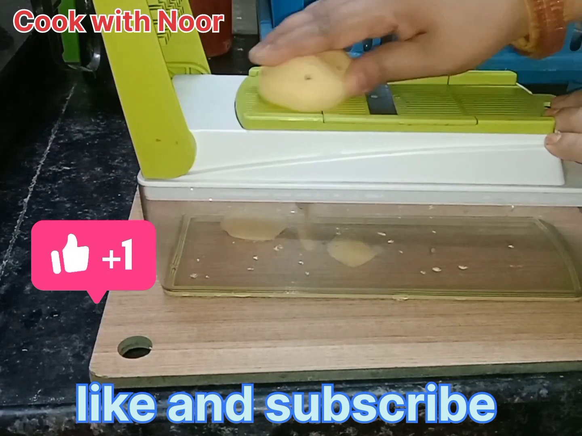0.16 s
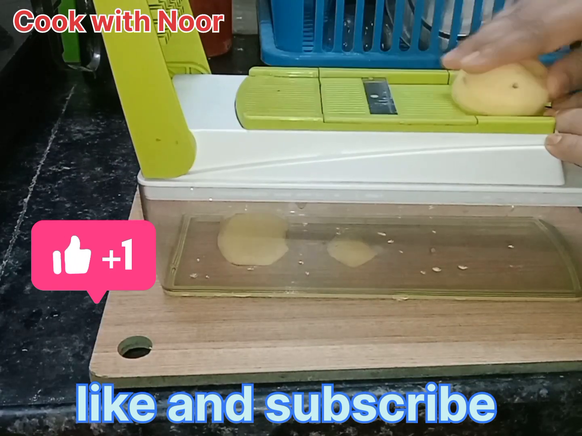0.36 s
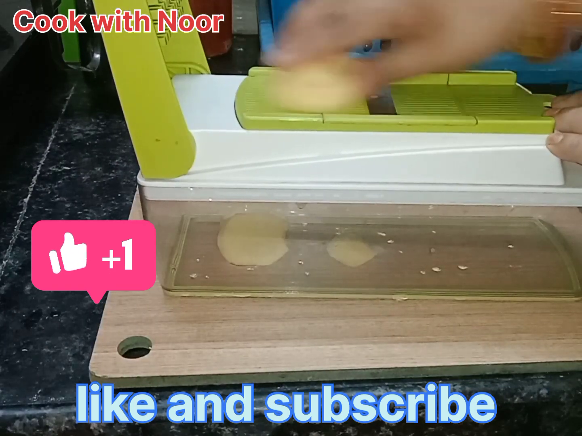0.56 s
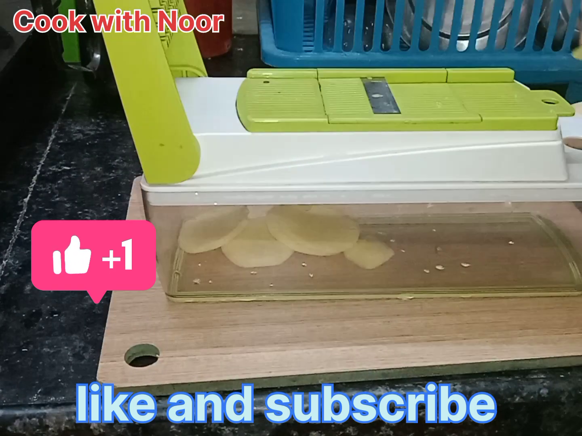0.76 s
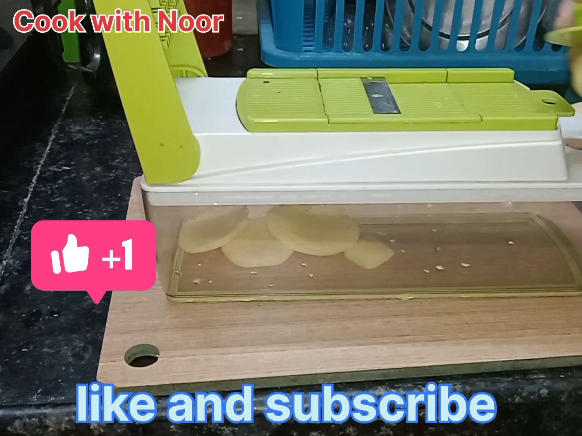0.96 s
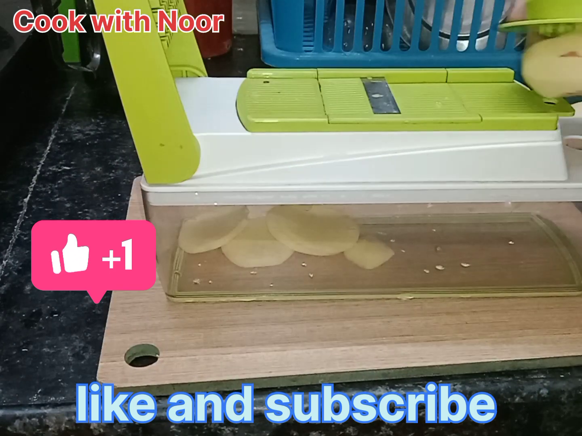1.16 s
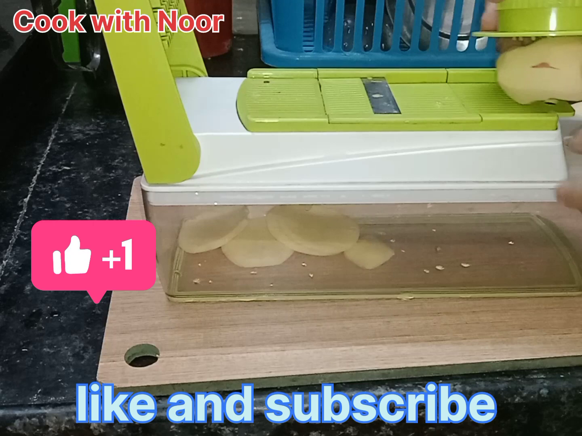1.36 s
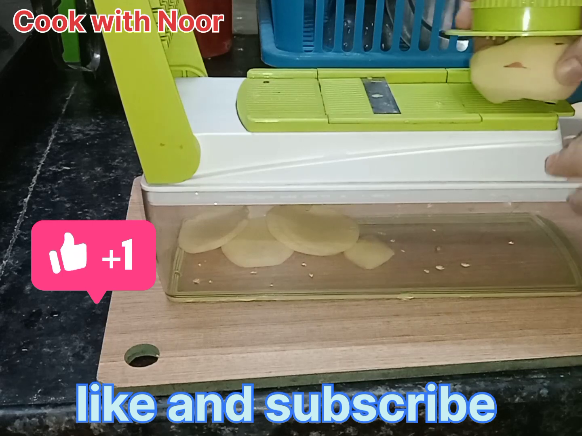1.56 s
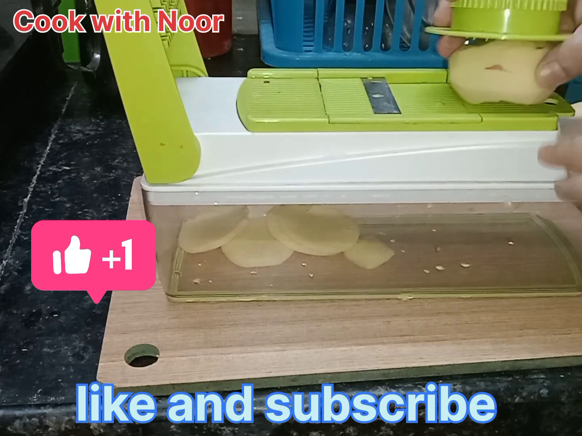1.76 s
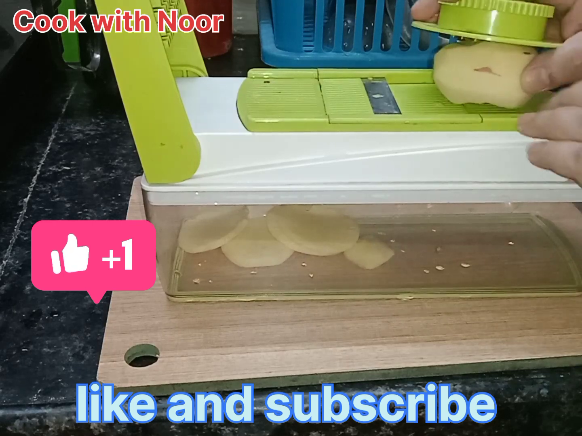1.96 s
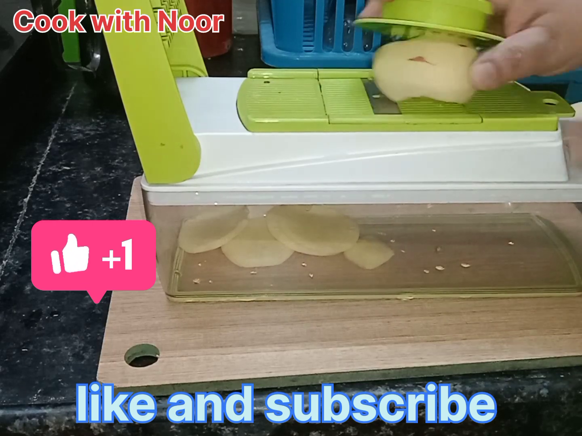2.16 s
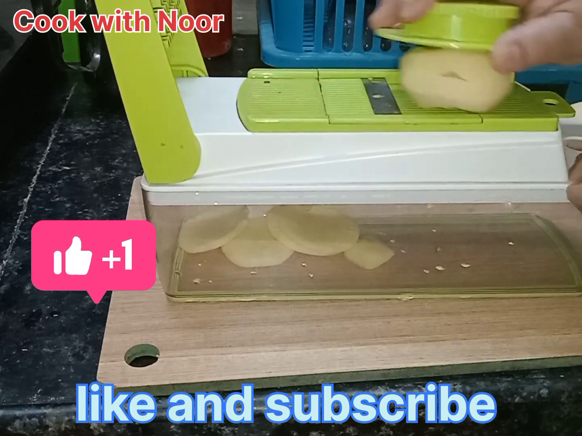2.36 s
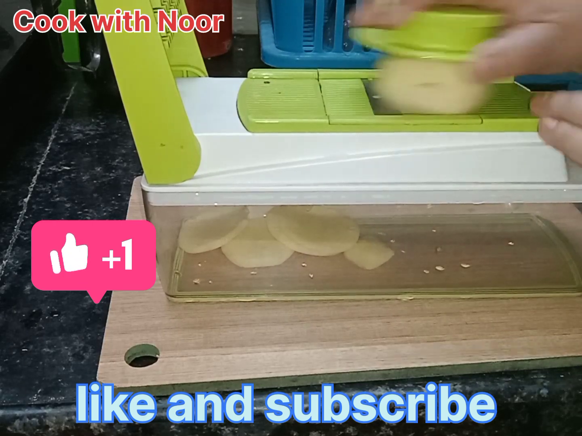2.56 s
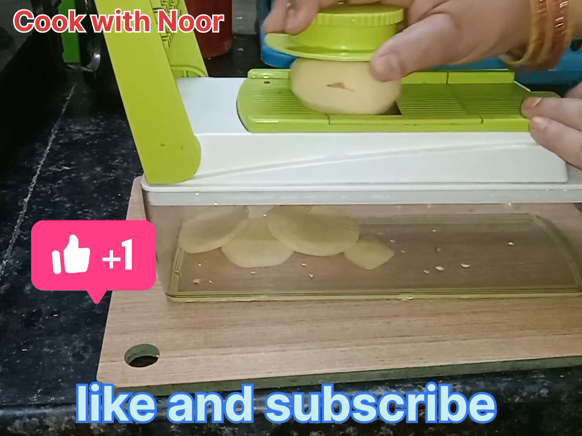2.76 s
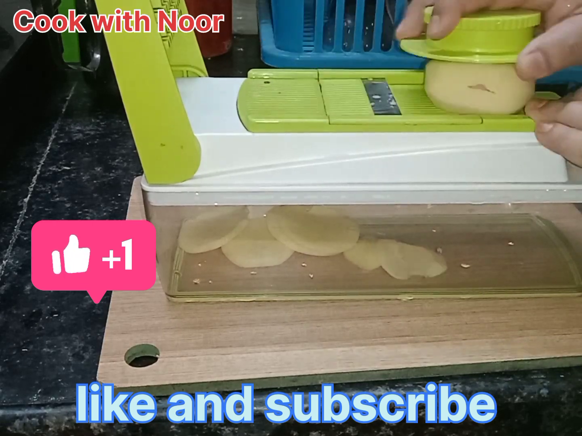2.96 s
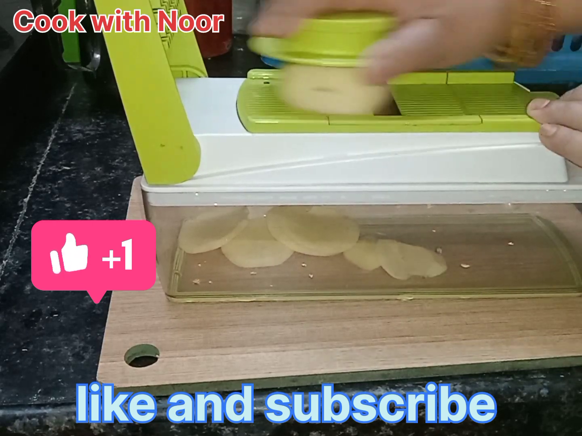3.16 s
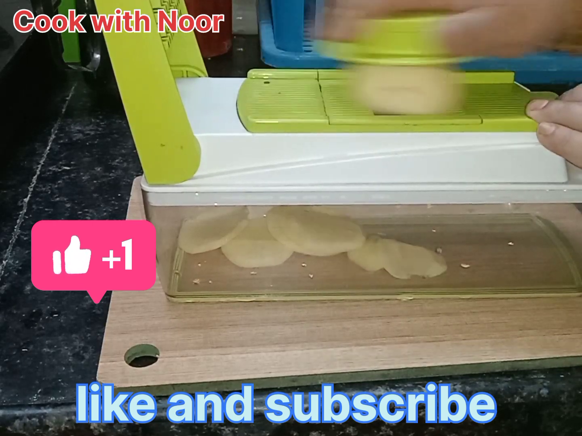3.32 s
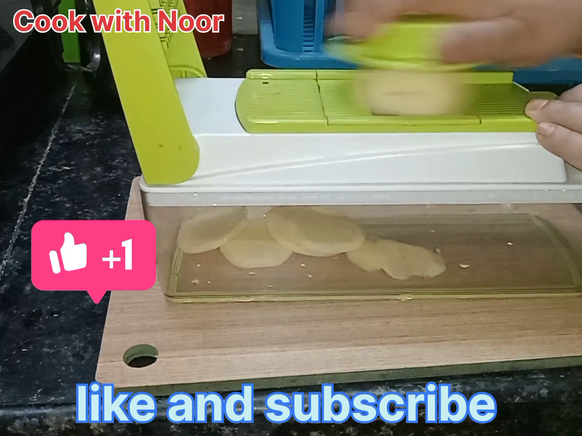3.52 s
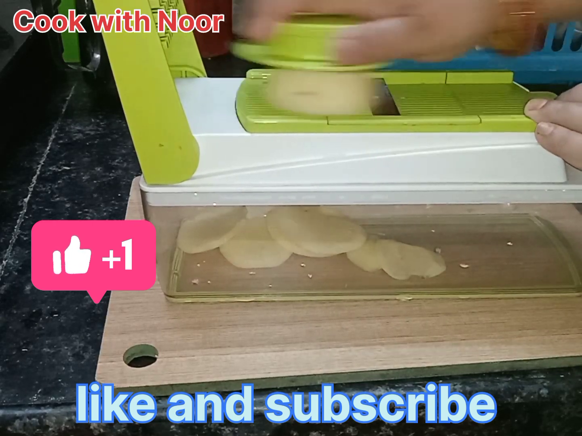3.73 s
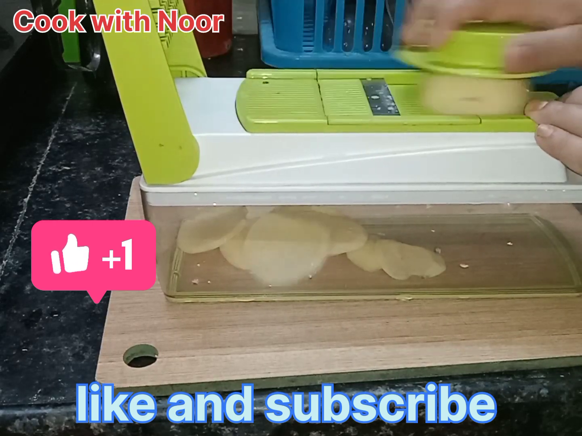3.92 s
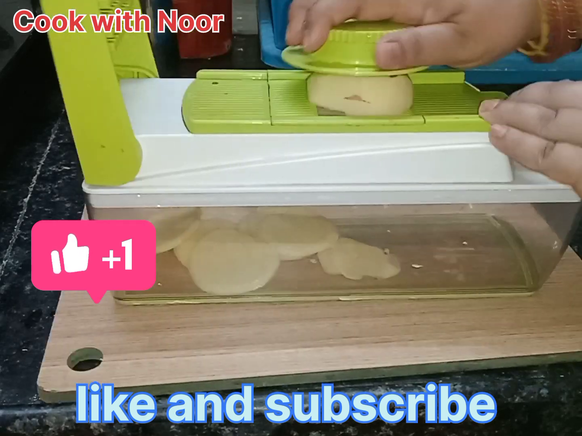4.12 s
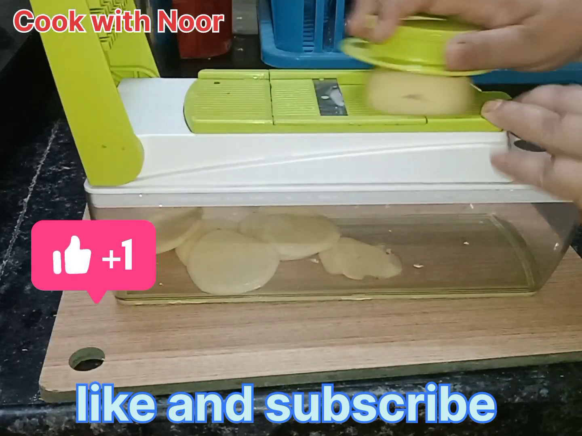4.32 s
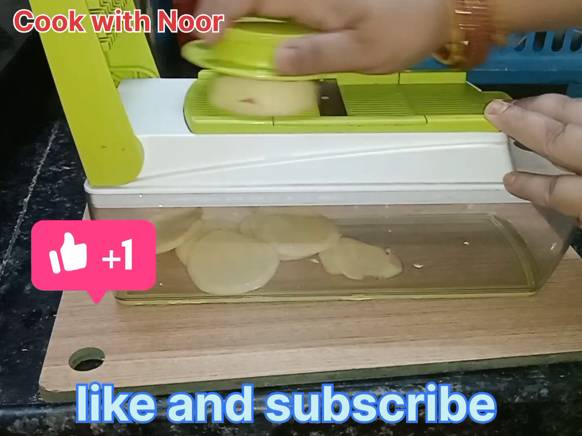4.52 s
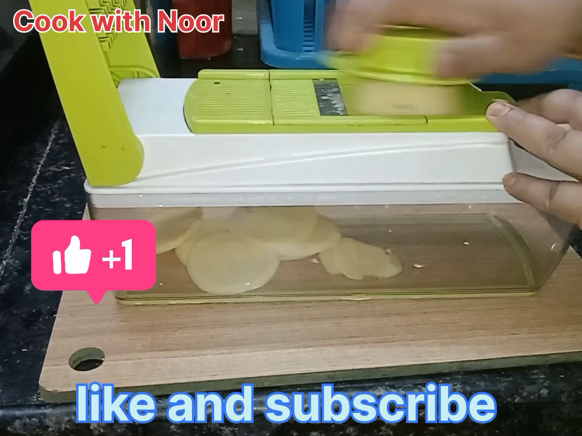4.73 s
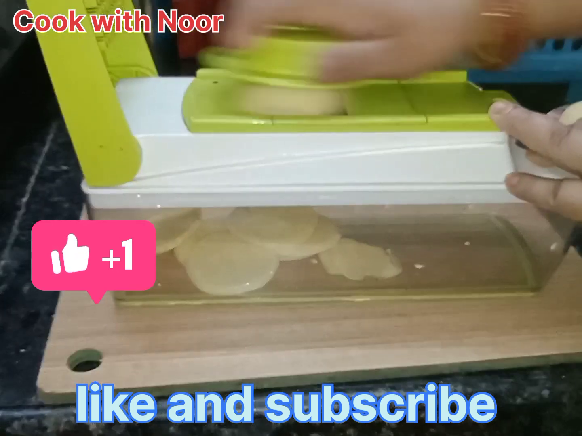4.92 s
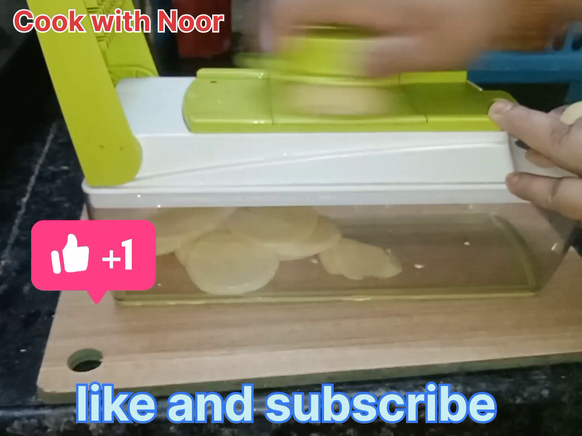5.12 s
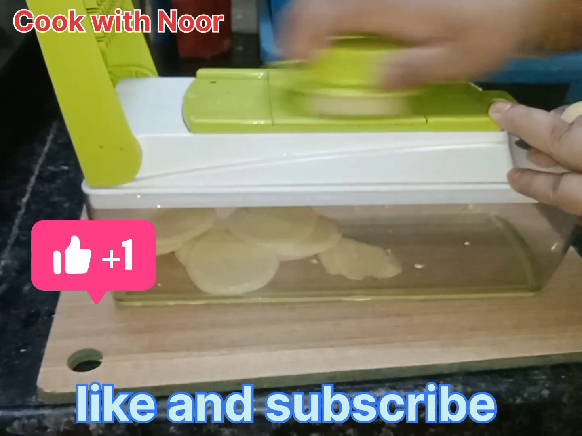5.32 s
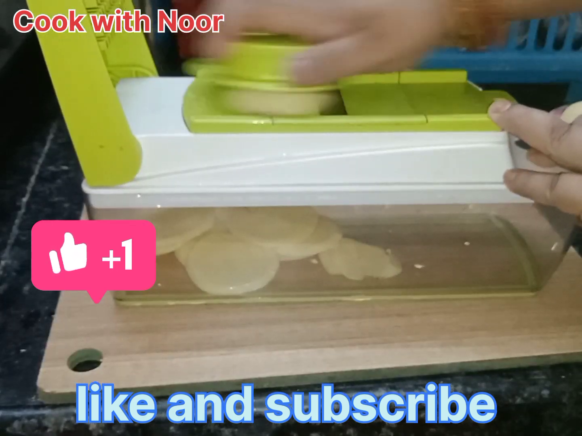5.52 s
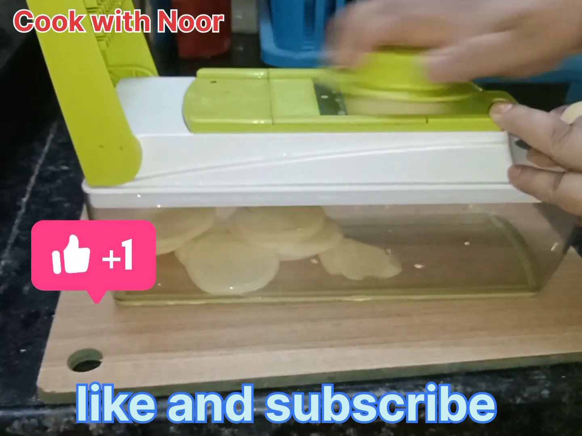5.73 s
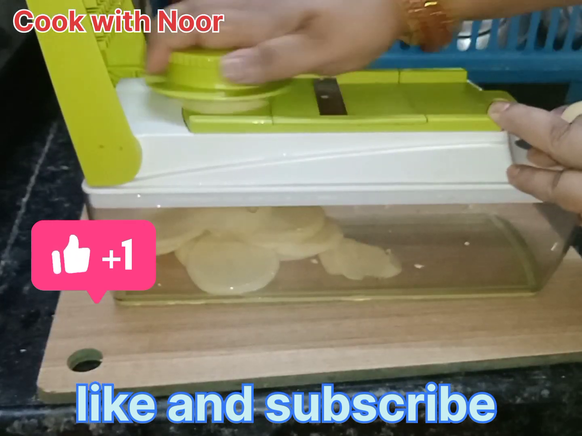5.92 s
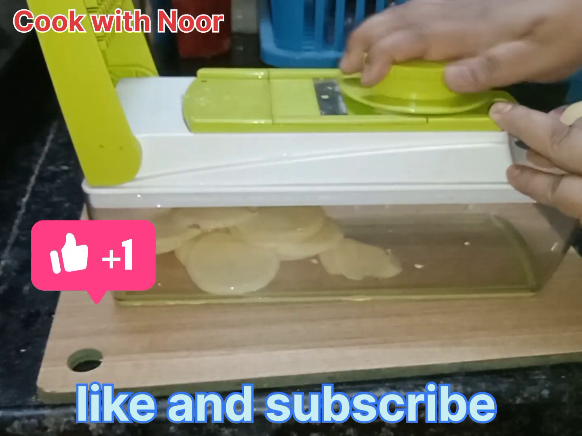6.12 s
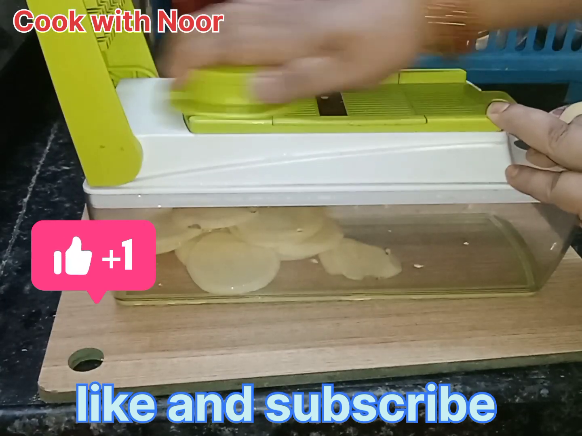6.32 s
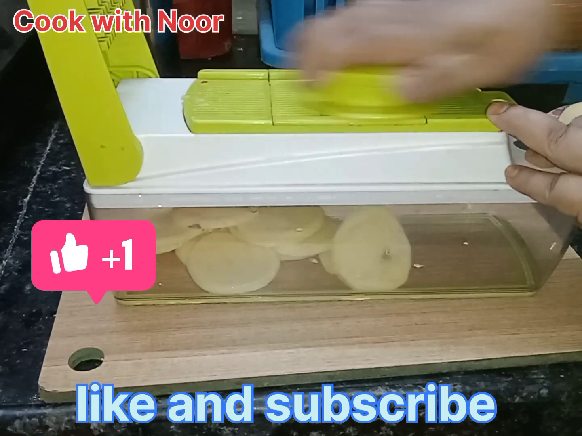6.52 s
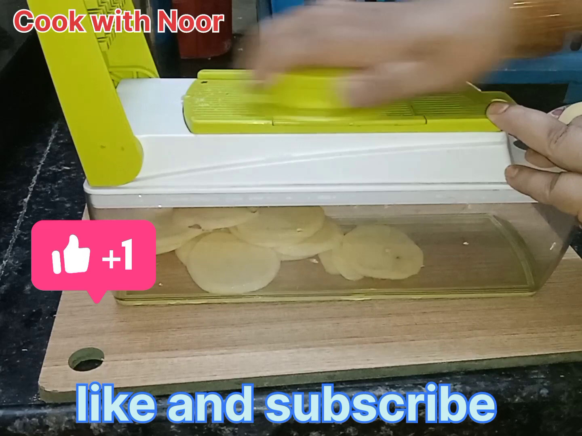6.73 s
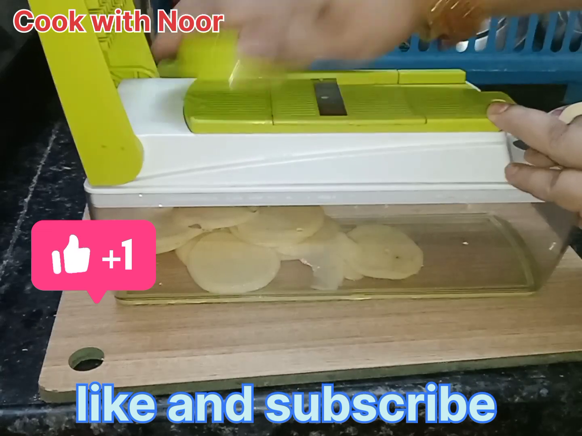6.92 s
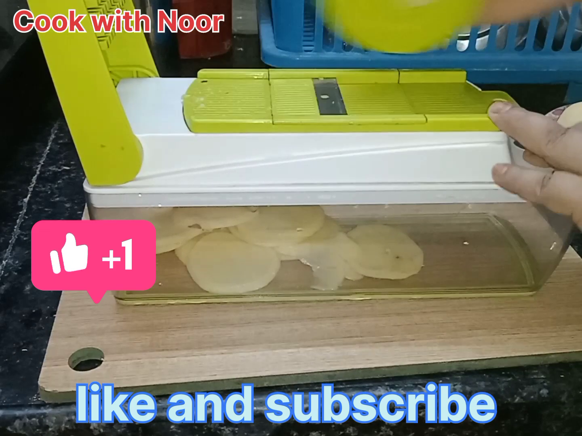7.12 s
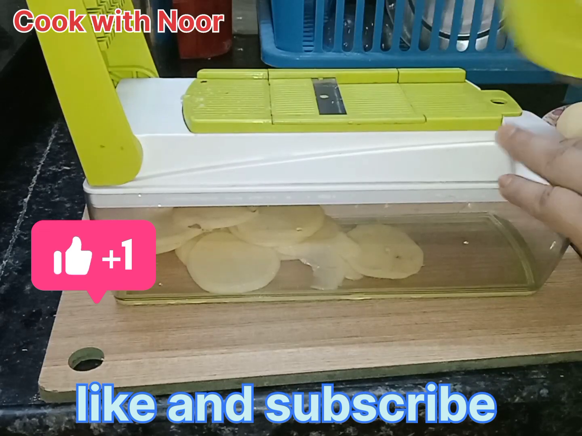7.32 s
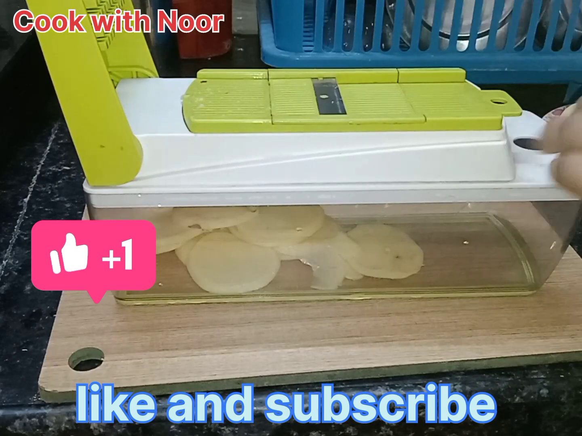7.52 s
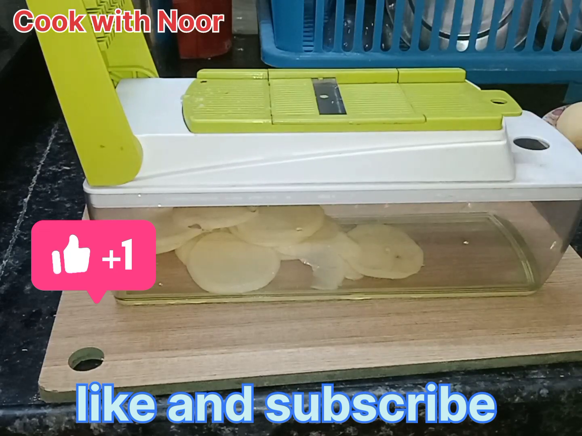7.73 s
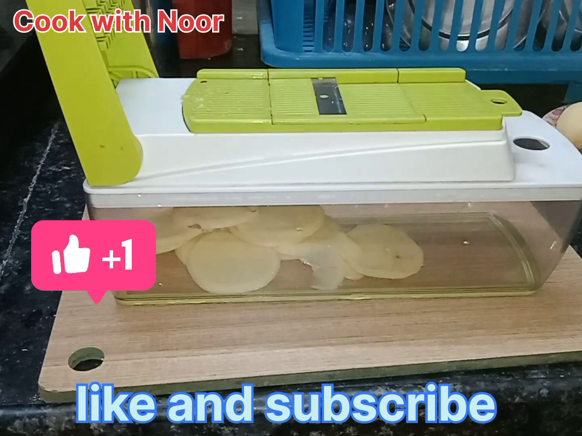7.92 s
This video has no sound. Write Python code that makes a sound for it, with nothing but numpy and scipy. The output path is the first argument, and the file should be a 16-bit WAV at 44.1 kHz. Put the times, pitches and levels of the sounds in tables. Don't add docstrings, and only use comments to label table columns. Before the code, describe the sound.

Wet scrapes and hard hollow knocks, a sudden cut to near quiet with plastic snaps, then potato slicing resumes in a steady back-and-forth rhythm.

```python
import sys
import numpy as np
from scipy import signal
from scipy.fft import rfft, irfft
from scipy.io import wavfile
from scipy.ndimage import map_coordinates

SR = 44100
rng = np.random.default_rng(int(sys.argv[2]) if len(sys.argv) > 2 else 0)


def elevation(decibels):
    levels = np.asarray(decibels, float)
    return 10 ** (levels / 20)


def transcribe(u):
    v = np.clip(np.atleast_2d(u).T, -1, 1)
    q = np.round(v * 32767).astype(np.int16)
    wavfile.write(sys.argv[1], SR, q)


N = 351918
CUT_S = 0.7765


# [f/Hz, level/dB, t60/s]
BOX_MODES = [(195, 11, .08), (299, 4, .047), (375, 4, .04)]
# [f/Hz, level/dB, t60/s]
DECK_MODES = [(459, 2, 0.014), (650.5, -9, 0.072), (825.4, -5.5, 0.07), (1047, -2, 0.023),
              (1310, -8.5, 0.048), (1940, -14, 0.054), (2160, -0.5, 0.0092)]
# [f/Hz, level/dB per Hz]
RUB_SPECTRUM = [(240, -5.5), (400, -9), (698, -3), (826, -2.5), (906, -2.5), (1250, -5.5), (1370, -40),
                (2120, -23), (3000, -15.5), (3900, -58.5), (6600, -120)]
# [f/Hz, level/dB per Hz]
HISS_SPECTRUM = [(1410, 0.5), (2400, -3.5), (2520, -3.5), (2930, -4.5), (3570, -4.5), (4860, -8.5),
                 (7230, -2), (7710, -9), (8750, -13.5), (9780, -17), (12500, -21.5), (13500, -24),
                 (15000, -10.5), (16000, -9)]
# [start t/s, swell t/s, hold t/s, level/dB]
FINGER_RUSTLES = [
    (1.081, 0.024, 0.38, -76.5),
    (1.51, .012, .002, -67.5),
    (2.126, 0.099, .002, -70.5),
    (2.38, 0.0065, .002, -84),
    (2.446, 0.013, .002, -69),
]


def strokes():
    bumps = grains(per_s=410, spread_db=2.5)
    rumble = rms_one(sum(elevation(db) * ring(bumps, hz, 1.27 * t60) for hz, db, t60 in BOX_MODES))
    slips = grains(per_s=1000, spread_db=2.0)
    ringing = rms_one(sum(elevation(db) * ring(slips, hz, 0.3 * t60) for hz, db, t60 in DECK_MODES))
    rub = rms_one(coloured(slips, RUB_SPECTRUM) + 0.68 * ringing)
    hiss = coloured(grains(per_s=9000, spread_db=2.0) + 0.3 * slips, HISS_SPECTRUM)
    flutter_db = 3.04 * drift(45)
    rustle_gain = swells(*np.transpose(FINGER_RUSTLES), fall=440)
    hiss_gain = pressure(layer=0) * elevation(flutter_db - 6.5) + rustle_gain
    scrape = pressure(layer=1) * elevation(flutter_db + 2.0) * rub + hiss_gain * hiss
    return pressure(layer=2) * rumble + patchy(scrape, patchy_db=3.0)


# [start t/s, swell t/s, hold t/s, wet hiss level/dB, deck rub level/dB]
PUSH_STROKES = [(0.118, 0.0065, 0.0024, -31, -33.5), (0.281, 0.0058, 0.035, -40.5, -42.5),
                (0.56, 0.014, 0.033, -43.5, -45.5), (0.735, 0.022, 0.014, -43, -45.5),
                (2.645, 0.036, 0.089, -48.5, -53.5), (3.147, 0.026, 0.065, -46, -50),
                (3.605, 0.025, 0.046, -43.5, -48.5), (4.07, 0.084, 0.0095, -45, -46),
                (4.472, 0.047, 0.054, -46.5, -52), (4.915, 0.059, 0.044, -43.5, -45.5),
                (5.4, 0.014, 0.059, -46.5, -49.5), (5.84, 0.039, 0.026, -41.5, -46),
                (6.155, 0.037, 0.042, -50.5, -51.5), (6.31, 0.024, 0.062, -44, -49),
                (6.631, 0.0038, 0.029, -44, -41.5), (6.772, 0.052, 0.05, -41, -48)]
# [start t/s, swell t/s, hold t/s, wet hiss level/dB, deck rub level/dB]
RETURN_STROKES = [(0.0, 0.00041, 0.0015, -66, -38.5), (0.44, 0.0089, .01, -92, -52.5),
                  (2.95, 0.0092, 0.0018, -52, -54.5), (2.99, 0.0091, 0.01, -60, -50.5),
                  (3.45, 0.0053, 0.039, -54.5, -52.5), (3.91, 0.008, .03, -48.5, -51.5),
                  (4.066, .006, 0.024, -53, -60), (4.28, 0.019, 0.0016, -62.5, -50),
                  (4.795, 0.0091, 0.03, -54.5, -48), (5.25, 0.0074, 0.034, -53.5, -54),
                  (5.685, 0.019, 0.033, -51, -53.5), (6.05, 0.022, 0.0088, -50, -46.5),
                  (6.5, 0.033, .002, -52.5, -66)]
PUSH_FALL, RETURN_FALL = (249, 307, 100), (165, 345, 180)   # hiss, rub, rumble die away (dB per s)


def pressure(layer):
    out = 0
    for rows, fall in ((PUSH_STROKES, PUSH_FALL), (RETURN_STROKES, RETURN_FALL)):
        start, swell, hold, hiss_db, rub_db = np.transpose(rows)
        rumble_db = -56.5 + 0.6 * (rub_db + 49)
        db = hiss_db, rub_db, rumble_db
        out = out + swells(start, swell, hold, db[layer], fall[layer])
    return out


# [t/s, thud level/dB, lowest mode level/dB, clack level/dB, crack level/dB]
BLADE_BITES = [(0.1237, -15, -9, -20, -27.5), (0.286, -24, -18.5, -25, -57), (0.568, -21.5, -7, -32, -64),
               (0.581, -17.5, -16, -20, -26.5), (0.752, -29, -9.5, -20, -50),
               (2.689, -45, -7.5, -31.5, -80), (3.175, -34.5, -10.5, -30.5, -63),
               (3.606, -48, -16, -47, -72), (3.629, -27.5, -8.5, -22.5, -69),
               (4.073, -36.5, -7.5, -38.5, -53), (4.152, -24, -16.5, -33, -42.5),
               (4.485, -51, -3, -38.5, -53), (4.911, -48, -16, -34.5, -88), (4.937, -50, -23, -36, -80),
               (4.96, -33, -10, -28.5, -49), (5.42, -40.5, -10, -23, -50), (5.863, -38.5, -27, -33, -69),
               (6.204, -40.5, -34, -29, -44.5), (6.401, -42.5, -16, -23.5, -43),
               (6.637, -33, -15.5, -34.5, -35.5), (6.785, -47, -5, -31, -61), (6.832, -49, -25, -33, -60),
               (6.862, -46, -25, -16.5, -48)]
# [t/s, thud level/dB, lowest mode level/dB, clack level/dB, crack level/dB]
STEP_DROPS = [(2.956, -44, -14, -41, -50), (3.018, -21, -16, -35, -57), (3.479, -21.5, -13.5, -34.5, -64),
              (3.918, -36.5, -6, -36.5, -68), (3.951, -15, -12, -27, -48), (4.286, -49, -8, -44, -53),
              (4.802, -31.5, -16, -41, -55), (4.841, -21, -9.5, -33.5, -52.5),
              (5.259, -32.5, -18, -48.5, -63), (5.292, -16.5, -16, -31, -53), (5.71, -29, -23, -45, -47.5),
              (5.737, -22.5, -18, -27, -49), (6.068, -36, -25, -43, -48.5)]
# [t/s, thud level/dB, lowest mode level/dB]
TURN_BUMPS = [(0.001, -38, -25), (0.447, -20.5, -14.5), (2.997, -36, -6), (3.363, -34, -17.5),
              (3.457, -27.5, -22.5), (3.771, -37.5, -9.5), (4.004, -50, 8.5), (4.133, -37.5, -12.5),
              (4.676, -45.5, -3), (5.637, -45, -6), (5.799, -42, -20), (5.966, -44, -9), (6.051, -42, -15),
              (6.168, -37.5, -31), (6.526, -44, -21)]


def knocks():
    dull = [(s, db, low, db - 13, db - 48) for s, db, low in TURN_BUMPS]
    blows = sorted(list(map(tuple, BLADE_BITES)) + list(map(tuple, STEP_DROPS)) + dull)
    s, thud_db, low_db, clack_db, crack_db = np.transpose(blows)
    upper_db = 2.5 + 0.7 * np.minimum(clack_db - thud_db, 4.0) - 0.17 * (thud_db + 44)
    upper_db = upper_db + 0.8 * (s - 4.0)
    chance = rng.standard_normal((len(s), len(DECK_MODES)))
    out = np.zeros(N)
    jolt = soften(rng.standard_normal(N), 0.00006)
    for (hz, db, t60), lean in zip(BOX_MODES, (low_db, 0, upper_db)):
        shudder = ring(clicks_at(s, thud_db + db + lean - 35.0), hz, 0.018)
        out += ring(shudder, hz, t60)
    for k, (hz, db, t60) in enumerate(DECK_MODES):
        heavy_db = (hz < 700) * 0.34 * (thud_db - clack_db - 1.5)
        sharp_db = (hz > 1500) * 0.55 * (crack_db - clack_db + 19.5)
        blow = clicks_at(s, clack_db + db + heavy_db + 2.2 * chance[:, k] + sharp_db - 21.5)
        strike = dying(blow, 0.013) * jolt + 2.77 * soften(blow, 0.00008)
        out += ring(strike, hz, t60) * (-1) ** min(k, 4)
    blow = soften(clicks_at(s, crack_db + 3.0), 0.00027)
    crack_gain = dying(blow, 0.015) + 0.2 * dying(blow, 0.019)
    rough = coloured(rng.standard_normal(N), HISS_SPECTRUM)
    return out + crack_gain * rms_one(soften(rough, 0.00002))


# [f/Hz, level/dB, t60/s]
DRAG_MODES = [(2072, 7, 0.035), (1747, -26, 0.017), (807, 1, 0.041)]


def guard():
    t = np.arange(N) / SR
    drag_from_s, lifted_s, squeak_s, squeak_width_s = 5.69, 7.0, 6.55, 0.035
    slips = grains(per_s=3300, spread_db=3.5)
    squeak_gain = elevation(-63) * np.exp(-((t - squeak_s) / squeak_width_s) ** 2)
    squeak = squeak_gain * rms_one(ring(slips, 3500, 0.015))
    resting = elevation(-74) * (t < lifted_s)
    drag_gain = (t > drag_from_s) * (pressure(layer=0) * elevation(-11) + resting)
    singing = sum(elevation(db) * ring(slips, hz, t60) for hz, db, t60 in DRAG_MODES)
    return drag_gain * rms_one(singing) + squeak


# [t/s, peak level/dB]
GUARD_SNAPS = [(1.0673, -29), (1.0745, -34), (1.082, -42), (1.091, -30.5), (1.1044, -44), (1.1294, -52),
               (2.2184, -63), (2.3217, -54), (2.6544, -48), (3.1564, -46), (3.4141, -51), (3.8033, -69),
               (7.071, -58), (7.38, -61.5)]
# [f/Hz, level/dB, t60/s]
SNAP_MODES = [(3030, -22, .02), (3550, -15, 0.031), (5730, -1, 0.034), (6940, -3, 0.021), (8340, -3, 0.017),
              (9200, -5.5, 0.023), (14000, -3, 0.009), (15100, 1, 0.021)]


def spikes():
    s, peak_db = np.transpose(GUARD_SNAPS)
    chance = rng.standard_normal((len(s), len(SNAP_MODES)))
    white = rng.standard_normal(N)
    modes = np.zeros(N)
    for (hz, db, t60), luck in zip(SNAP_MODES, chance.T):
        tear = dying(clicks_at(s, peak_db + db + 4.0 * luck - 28), 0.0031) * white
        modes += ring(tear, hz, t60)
    treble = signal.butter(2, 5000, "high", fs=SR, output="sos")
    bright = signal.sosfilt(treble, white[::-1])
    return modes + dying(clicks_at(s, peak_db - 14.5), 0.011) * bright


# [t/s, peak level/dB, low ring f/Hz, middle ring f/Hz, high ring f/Hz]
BANGLE_TOUCHES = [(0.8305, -68, 7520, 9040, 12000), (0.854, -66, 7540, 9130, 13200),
                  (0.8789, -65, 7420, 8420, 12000), (1.3917, -62, 7380, 8380, 12000),
                  (1.5174, -40, 7580, 8880, 12300), (3.0809, -54, 5700, 9110, 13300),
                  (3.5653, -51, 6300, 7200, 9120), (4.0108, -49, 7040, 8510, 11800),
                  (4.8728, -51, 7190, 8790, 11300), (4.9327, -49, 6490, 9080, 13300),
                  (5.3727, -48, 6700, 9100, 13400), (5.8032, -49, 7220, 9630, 13600),
                  (6.2567, -50, 7530, 9120, 13400), (6.7301, -56, 7140, 9790, 11900)]
# [level/dB, t60/s]
BANGLE_MODES = [(3.5, 0.11), (5.5, 0.15), (5, 0.12), (-10, 0.1), (4, 0.13)]


def bangles():
    out = np.zeros(N)
    t = np.arange(int(0.3 * SR)) / SR
    treble = signal.butter(4, 8000, "high", fs=SR, output="sos")
    tick = signal.sosfilt(treble, rng.standard_normal(len(t)))
    for s, peak_db, low_hz, middle_hz, high_hz in BANGLE_TOUCHES:
        grip = 1.6 if s > 2.6 else 1
        pitches = low_hz, middle_hz, high_hz, 0.6 * low_hz, 1.165 * high_hz
        song = np.zeros(len(t))
        for hz, (db, t60) in zip(pitches, BANGLE_MODES):
            beat = 1 + 0.3 * np.cos(2 * np.pi * hz * 0.0037 * t)
            song += elevation(db - 60 * t / t60 * grip) * np.sin(2 * np.pi * hz * t) * beat
        at = int(s * SR)
        out[at:at + len(t)] += elevation(peak_db - 24 - 0.94 * (grip - 6.0)) * song
        out[at:at + len(t)] += elevation(peak_db - 13 - 60 * t / 0.02) * tick
    return out


# [t/s, level/dB]
BOARD_JOLTS = [
    (0.125, -67),
    (0.447, -74),
    (0.58, -68),
    (3.18, -75),
    (3.63, -76),
    (4.1, -76),
    (4.96, -72),
    (5.42, -73),
    (6.637, -80),
]


def jolts():
    push = soften(clicks_at(*np.transpose(BOARD_JOLTS)), 0.00075) * 10
    return ring(push, 89.5, 0.11)


def kitchen(x):
    t60_s, wall_cut_hz, level_db = 0.37, 6000, -13.5
    t = np.arange(int(0.6 * SR)) / SR
    tail = rng.standard_normal(len(t)) * elevation(-60 * t / t60_s) * np.clip(t / 0.0095, 0, 1)
    dull = signal.sosfilt(signal.butter(1, wall_cut_hz, fs=SR, output="sos"), tail)
    tail = dull + (tail - dull) * elevation(-60 * t / 0.1)
    return elevation(level_db) * signal.fftconvolve(x, tail / np.sqrt(np.sum(tail ** 2)))[:N]


# [f/Hz, level/dB per Hz]
AIR_SPECTRUM = [(18, -39), (30, -33.5), (43, -33), (103, 0.5), (210, 2.5), (319, -4), (632, -9.5),
                (721, -7.5), (1070, -12), (1810, -16.5), (2120, -19.5), (4910, -30.5), (6720, -29),
                (11400, -45), (16000, -28.5)]
# [t/s, level/dB]
AIR_LEVELS = [(0.0, -58.5), (0.78, -64.5), (2.5, -64.5), (6.9, -63), (7.05, -67), (7.98, -67)]
# [f/Hz, width f/Hz, level/dB, rise over the scene level/dB]
APPLIANCE_TONES = [(1820, 92, -88, 6), (204, 21, -75.5, -14), (133.3, 18, -76, -12.5)]


def air():
    level_db, = in_time([AIR_LEVELS])
    white = rng.standard_normal(N)
    tones = np.zeros(N)
    for hz, width, db, rise_db in APPLIANCE_TONES:
        waver_db = db + rise_db * np.arange(N) / N + 6.1 * drift(9.8)
        tones += elevation(waver_db) * rms_one(ring(white, hz, 6.7 / width))
    return elevation(level_db + 0.14 * drift(6.3)) * coloured(rng.standard_normal(N), AIR_SPECTRUM) + tones


def swells(start, swell, hold, db, fall):
    t = np.arange(0, N + 32, 32)[:, None] / SR - start
    rise_db = 20 * np.minimum(t / np.maximum(swell, 1e-3) - 1, 0)
    shape_db = rise_db - fall * np.maximum(t - swell - hold, 0)
    gain = np.sum(elevation(db + shape_db) * (t >= 0), axis=1)
    return np.interp(np.arange(N) / 32, np.arange(len(gain)), gain)


def patchy(x, patchy_db):
    hz, s, cells = signal.stft(x, SR, nperseg=256)
    blotches = rng.standard_normal((40, 400))
    where = np.meshgrid(4 * np.log2(1 + hz / 500), s / 0.03, indexing="ij")
    gain = elevation(patchy_db * map_coordinates(blotches, where, order=1))
    return signal.istft(cells * gain, SR, nperseg=256)[1][:N]


def grains(per_s, spread_db):
    sizes = elevation(spread_db * np.minimum(rng.exponential(1, N), 5)) * rng.choice([-1, 1], N)
    return sizes * (rng.random(N) < per_s / SR)


def clicks_at(s, db):
    out = np.zeros(N)
    out[(np.asarray(s) * SR).astype(int)] = elevation(db)
    return out


def ring(clicks, hz, t60):
    r, w = elevation(-60 / (t60 * SR)), 2 * np.pi * min(hz, 20000) / SR
    return signal.lfilter([0, np.sin(w)], [1, -2 * r * np.cos(w), r * r], clicks + 1e-18)


def soften(x, contact_s):
    r = np.exp(-1 / (contact_s * SR))
    return signal.lfilter([(1 - r) ** 2], [1, -2 * r, r * r], x + 1e-18)


def dying(clicks, t60):
    return signal.lfilter([1], [1, -elevation(-60 / (t60 * SR))], clicks + 1e-18)


def coloured(x, points):
    hz, db = np.transpose(points)
    axis = np.maximum(np.fft.rfftfreq(N, 1 / SR), 1)
    gain = elevation(np.interp(np.log(axis), np.log(hz), db, -90, -90))
    return rms_one(irfft(rfft(x) * gain, N))


def rms_one(x):
    return x / np.sqrt(np.mean(x ** 2) + 1e-20)


def drift(rate):
    knots = rng.standard_normal(2000)
    return np.interp(np.arange(N) * rate / SR, np.arange(2000), knots)


def in_time(tables):
    s, *columns = np.transpose(np.vstack(tables))
    return [np.interp(np.arange(N) / SR, s, c) for c in columns]


def scene():
    first_top_hz, box_cut_hz, fade_in_s = 14700, 185.8, 0.21
    t = np.arange(N) / SR
    dry = strokes() + guard() + knocks() + bangles()
    close = spikes()
    no_bass = signal.butter(6, box_cut_hz, "high", fs=SR, output="sos")
    dry = signal.sosfilt(no_bass, dry)
    first, second = dry * (t < CUT_S), dry * (t >= CUT_S)
    first = soften(first, 0.000015)
    room = air() + jolts()
    first_top = signal.cheby2(18, 50, first_top_hz, fs=SR, output="sos")
    first = signal.sosfilt(first_top, first + kitchen(first) + room)
    second = second + close + kitchen(second + 0.4 * close) + room
    fade_out = np.clip((CUT_S - t) / 0.0017, 0, 1)
    fade_in = np.clip((t - CUT_S) / fade_in_s, 0, 1) ** 2
    mono = first * fade_out + second * fade_in
    return np.array([mono, mono])


# [from t/s, to t/s, low f/Hz, high f/Hz, share of patches 0-1]
UNRELATED_TREBLE = [
    (0, .78, 4400, 14000, .55),
    (2.6, 5.5, 9500, 14800, .65),
    (2.6, 5.5, 4300, 9500, .03),
    (5.65, 5.95, 9500, 15000, .4),
    (6.62, 6.72, 4300, 15800, .5),
]


def patchy_side(mono):
    hz, s, cells = signal.stft(mono, SR, nperseg=1024)
    luck = rng.random((40, 120))[(hz / 700).astype(int)][:, (s / 0.07).astype(int)]
    share = np.zeros(cells.shape)
    for start, end, low, high, part in UNRELATED_TREBLE:
        share += part * ((hz >= low) & (hz < high))[:, None] * ((s >= start) & (s < end))
    turned = cells * np.exp(2j * np.pi * rng.random(cells.shape)) * (luck < share)
    return elevation(-4) * signal.istft(turned, SR, nperseg=1024)[1][:N]


def low_pass(x):
    return signal.sosfilt(signal.butter(12, 16970, fs=SR, output="sos"), x)


def record(dry):
    wide = dry + patchy_side(dry[0]) * [[1], [-1]]
    top_cut = signal.cheby2(24, 50, 16100, fs=SR, output="sos")
    mix = signal.sosfilt(top_cut, wide)
    return low_pass(mix)


dry = scene()
out = record(dry)
transcribe(out)
```